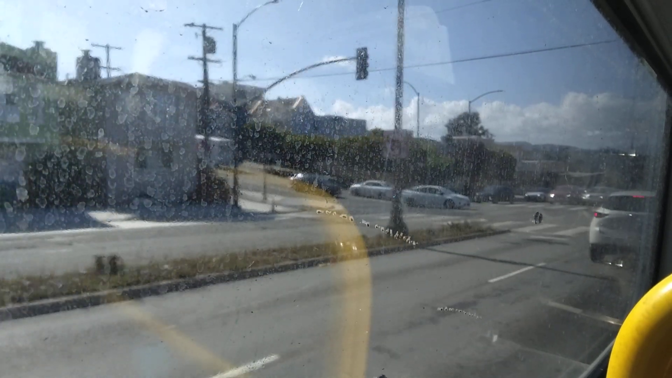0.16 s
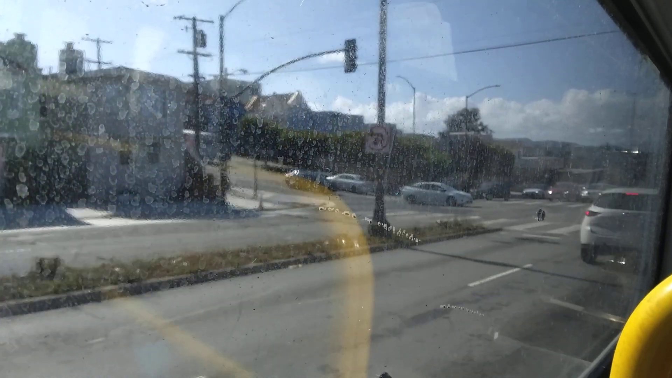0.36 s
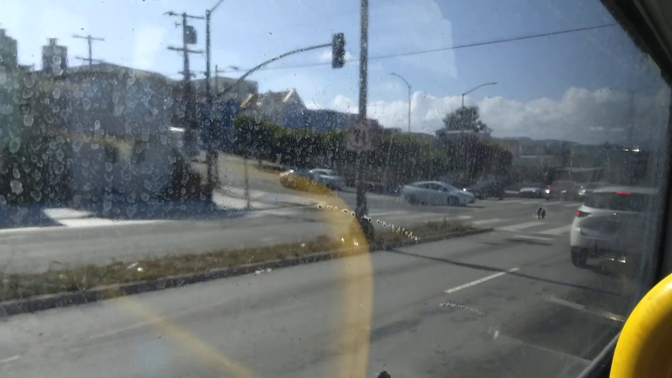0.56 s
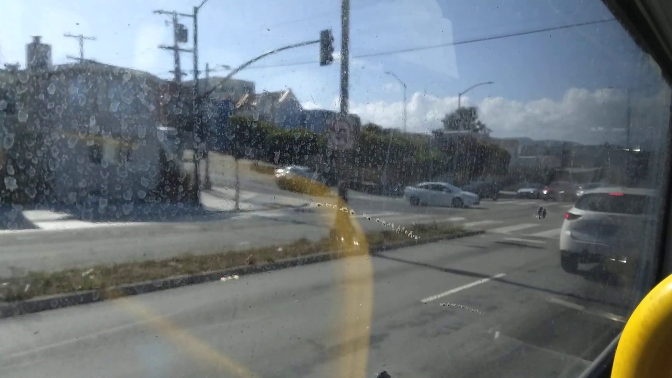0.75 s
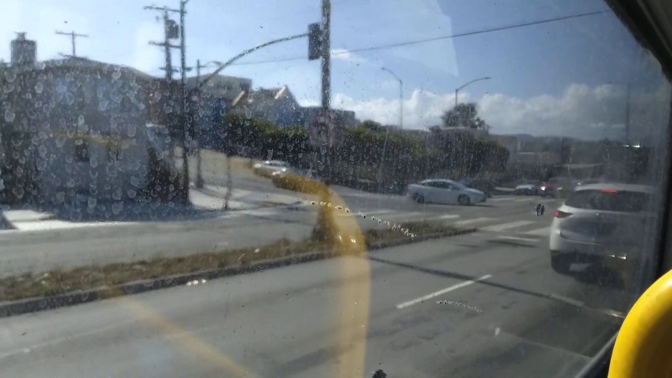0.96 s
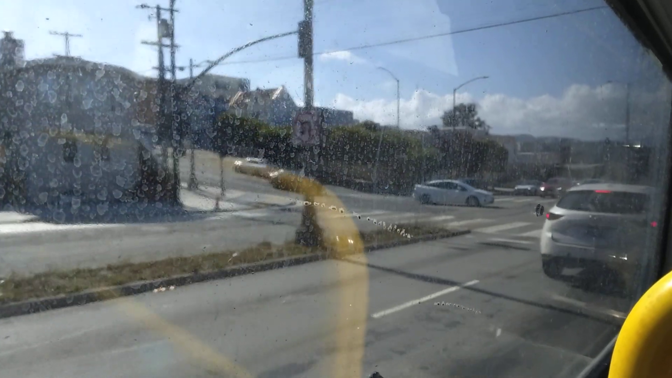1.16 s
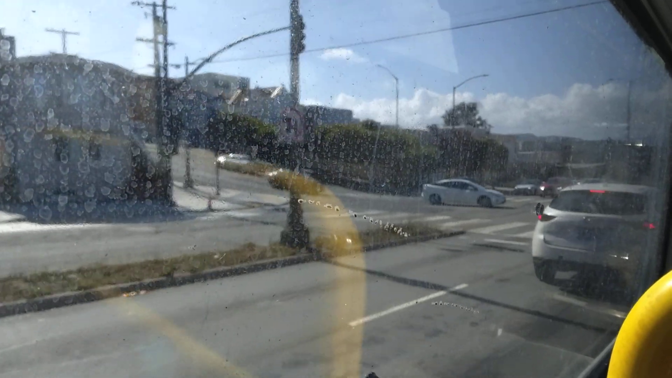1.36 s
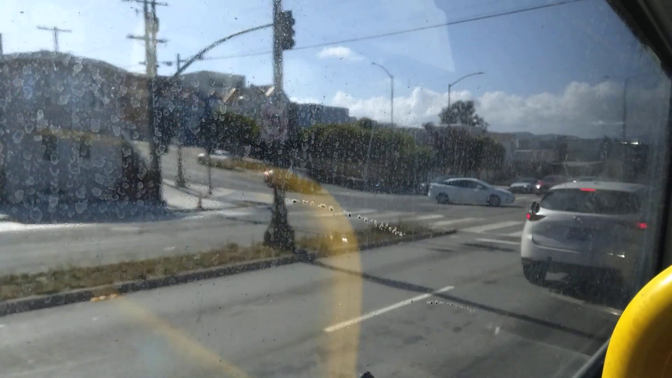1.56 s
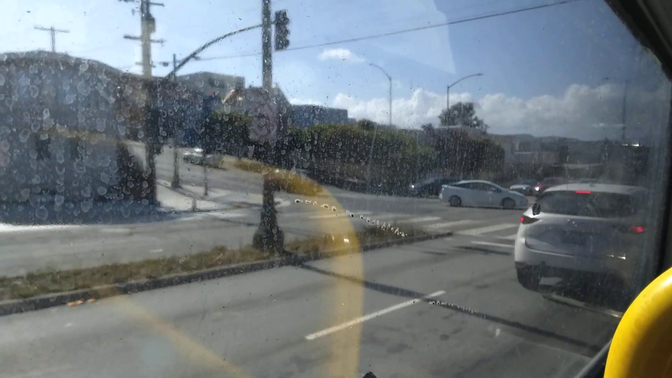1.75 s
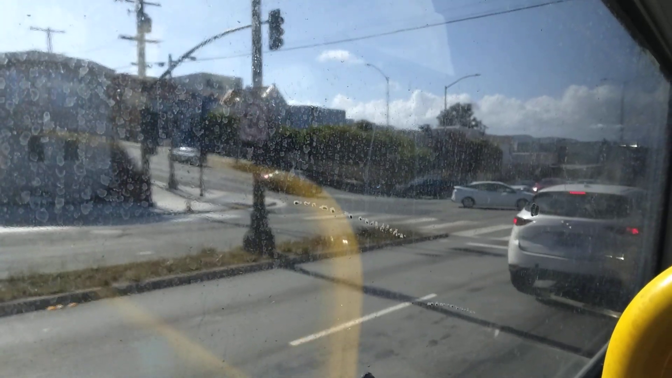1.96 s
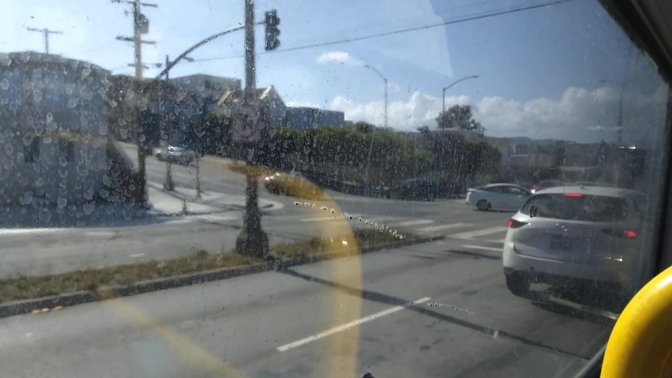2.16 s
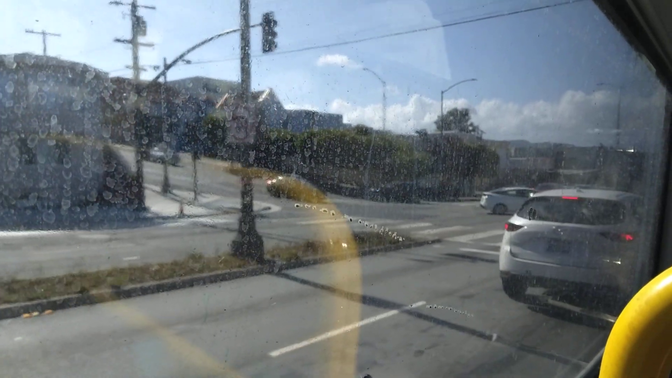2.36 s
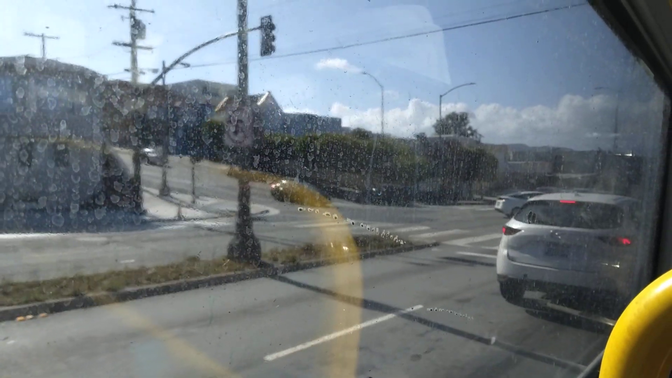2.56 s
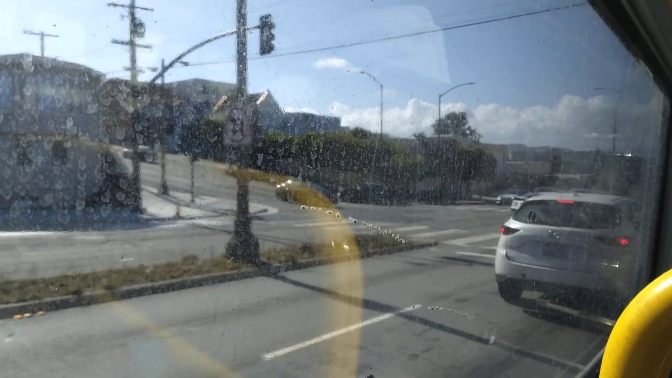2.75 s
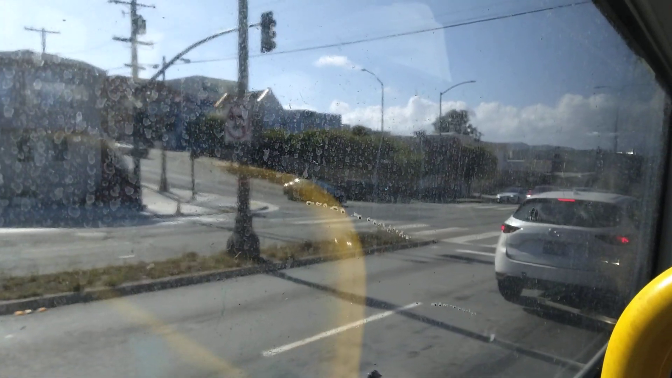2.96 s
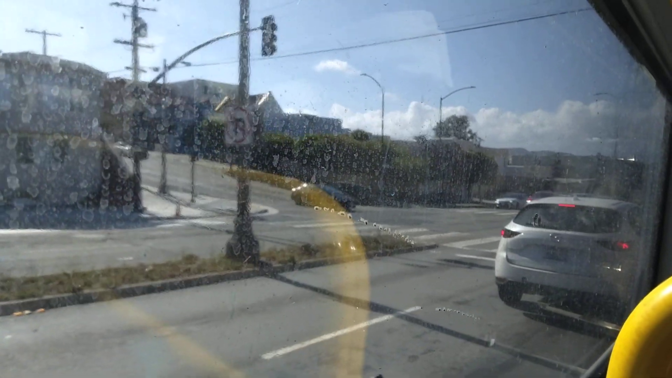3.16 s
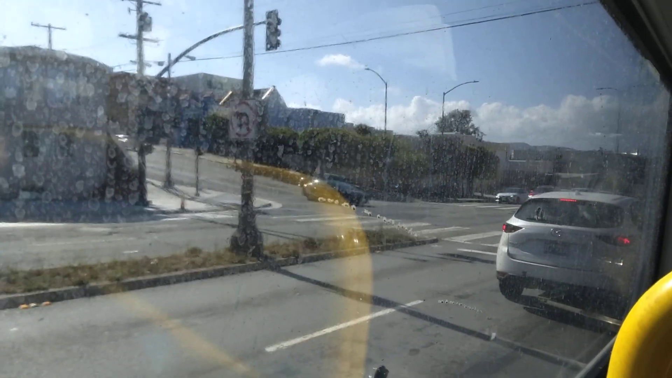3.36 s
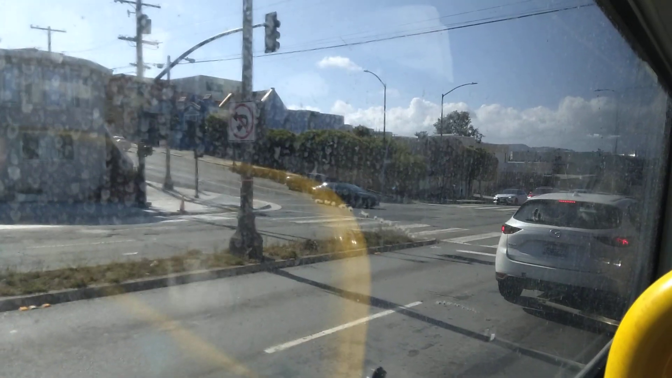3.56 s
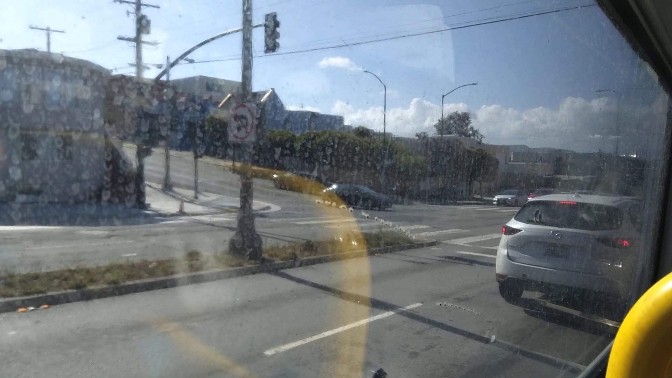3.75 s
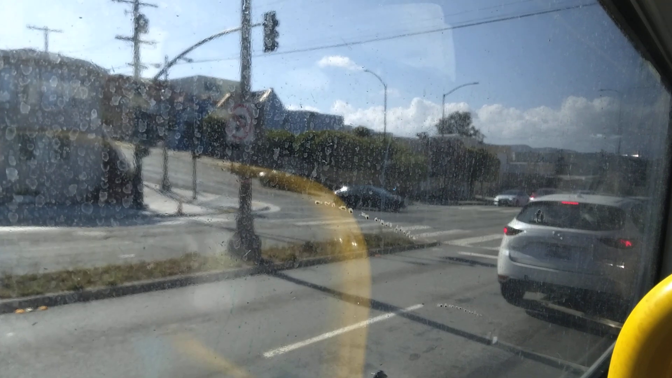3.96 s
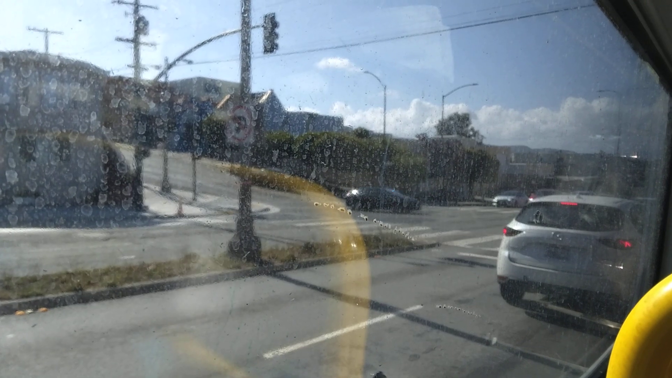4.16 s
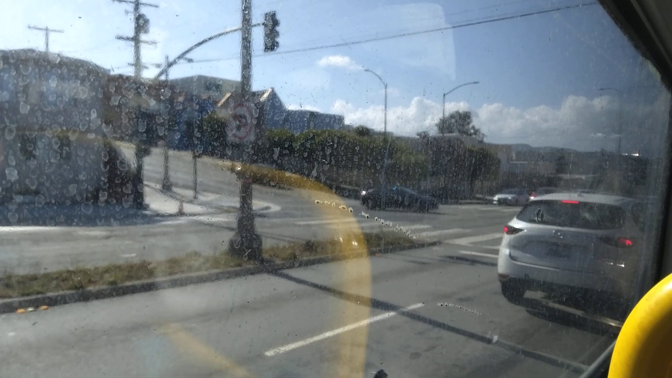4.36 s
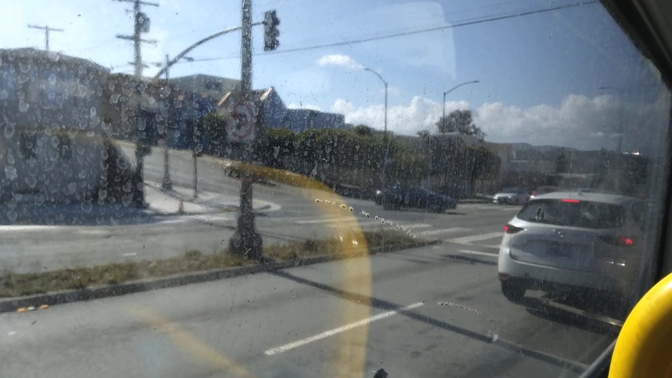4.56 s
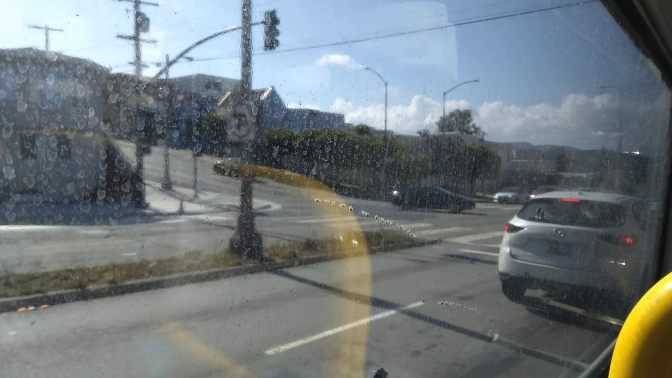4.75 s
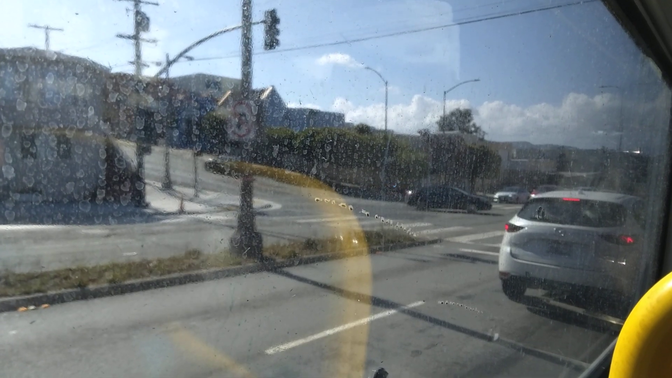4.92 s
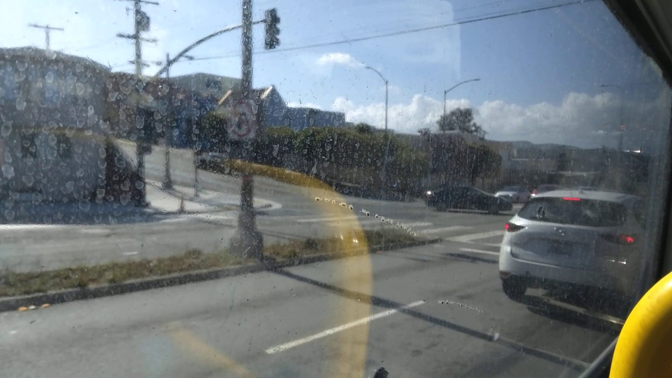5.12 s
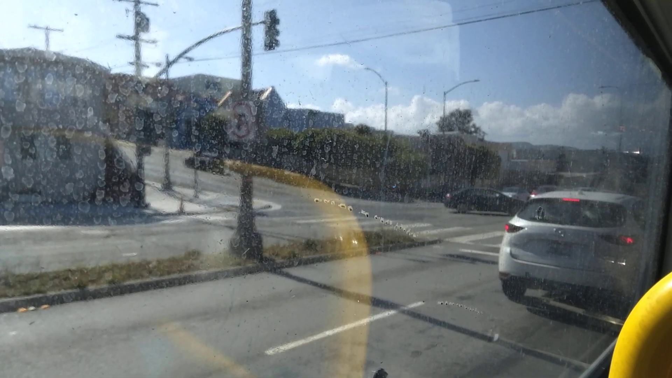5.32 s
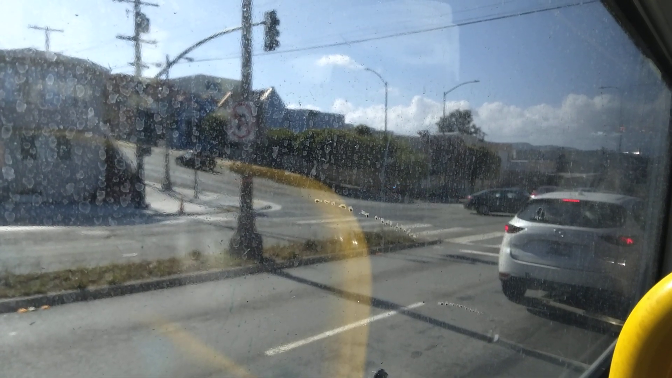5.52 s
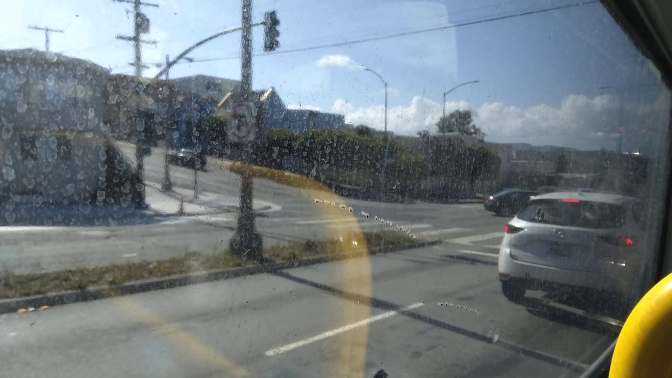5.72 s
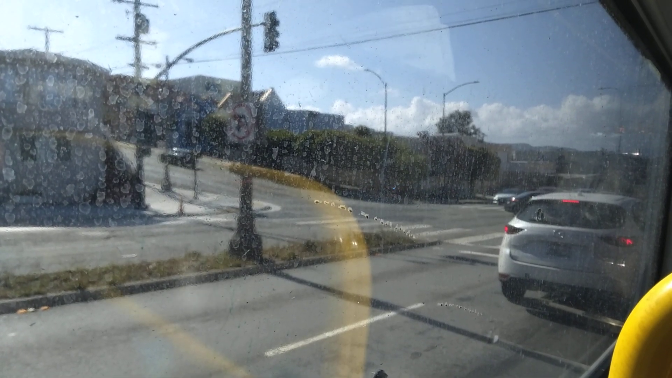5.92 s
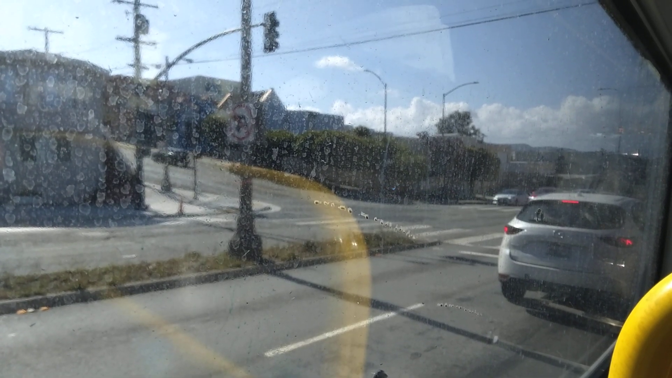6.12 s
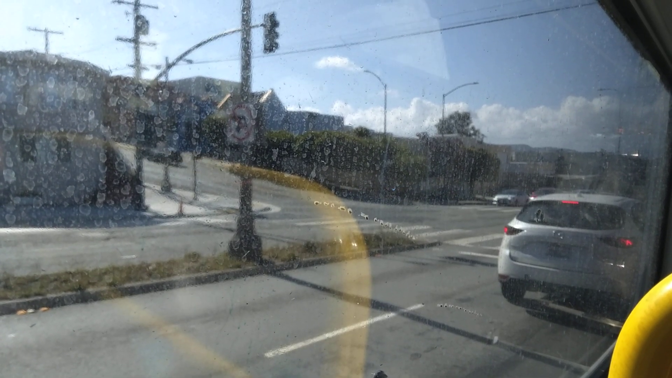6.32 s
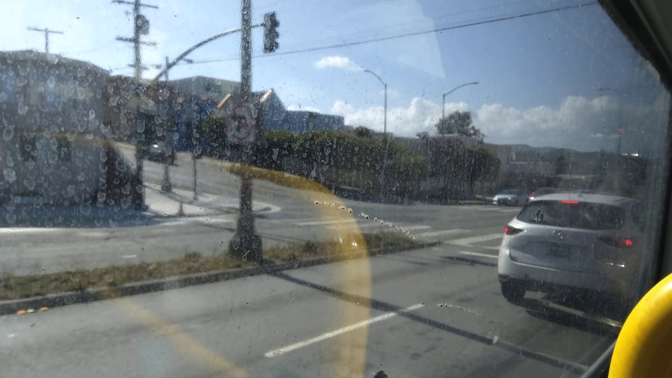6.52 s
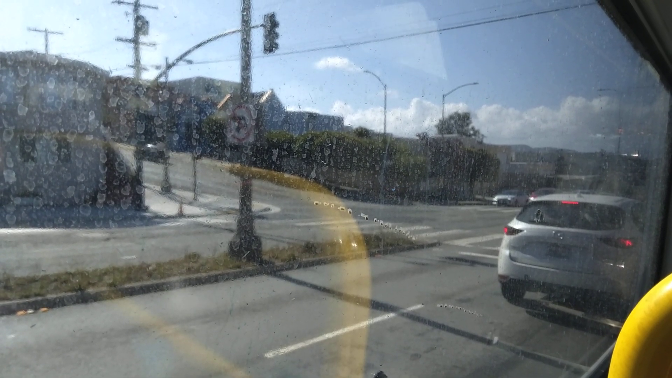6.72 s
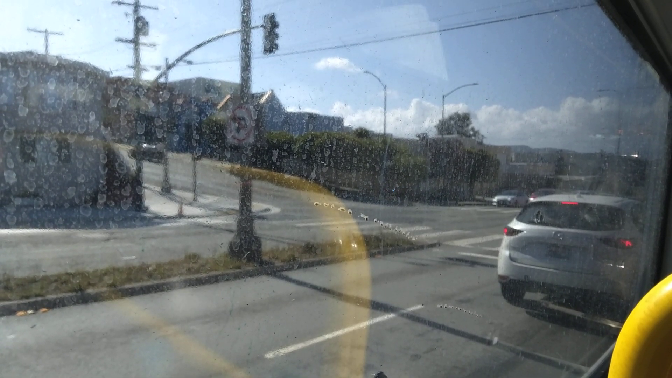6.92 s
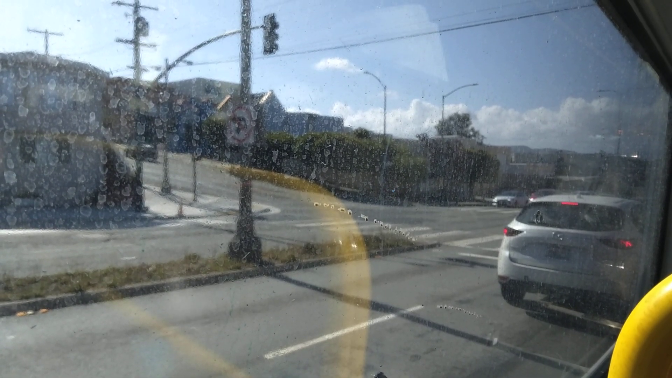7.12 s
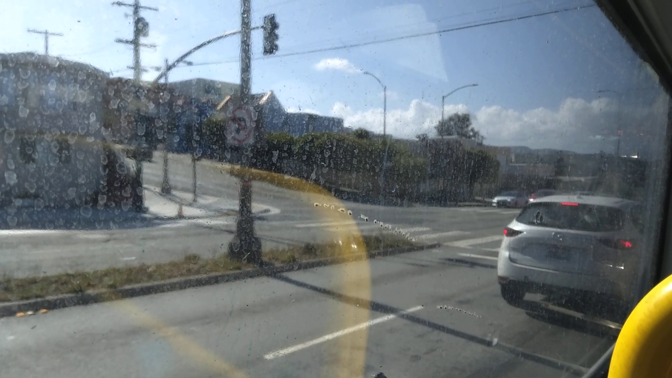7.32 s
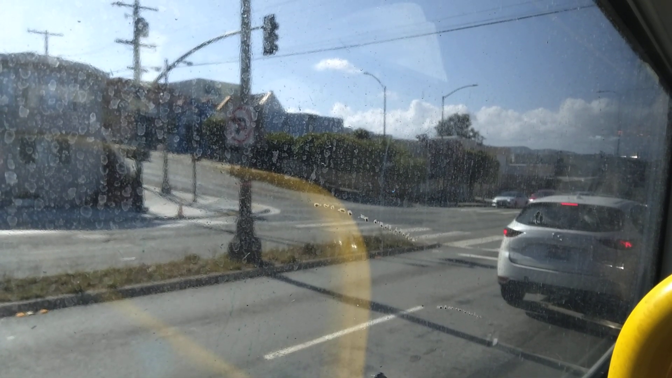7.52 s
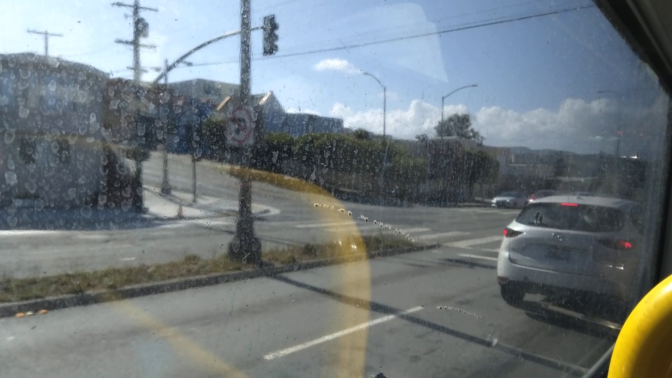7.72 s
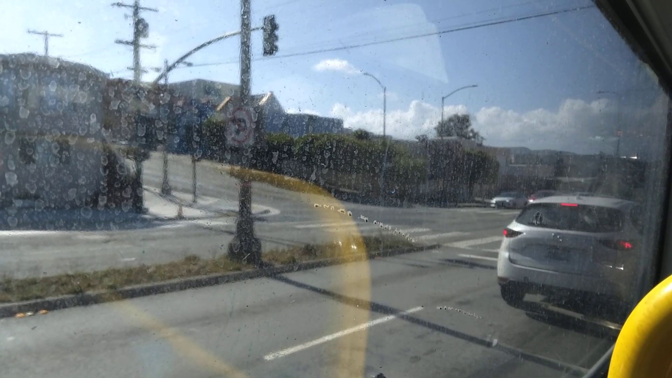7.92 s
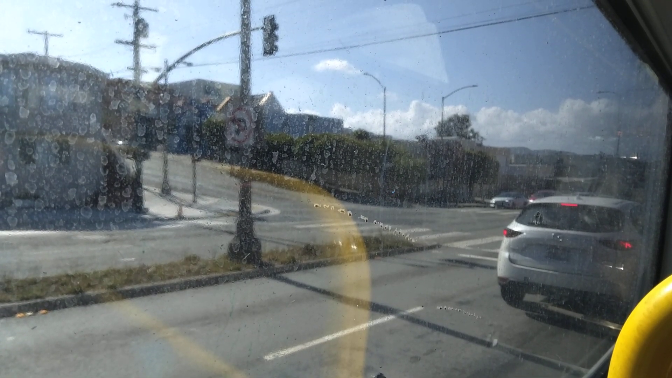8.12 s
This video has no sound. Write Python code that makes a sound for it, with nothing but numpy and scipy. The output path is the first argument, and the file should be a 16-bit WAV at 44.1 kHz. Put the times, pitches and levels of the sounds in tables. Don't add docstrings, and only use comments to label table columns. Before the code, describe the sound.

Heard from within the passenger cabin in stereo, a bus slows under a low engine boom. The drive whine descends and fades out, an opening burst of brake air sags away, and the floor rumbles and rocks. Small ticks and creaks come before the lurching stop; afterwards faint air leaks give way to even idling and soft fan hiss.

```python
import sys
import numpy as np
from scipy import signal
from scipy.fft import rfft, irfft, next_fast_len
from scipy.io import wavfile
from scipy.ndimage import uniform_filter1d

SR = 44100
rng = np.random.default_rng(int(sys.argv[2]) if len(sys.argv) > 2 else 0)


def output_pcm(signal):
    pcm = np.clip(np.atleast_2d(signal).T, -1, 1) * 32767
    wavfile.write(sys.argv[1], SR, np.round(pcm).astype(np.int16))


def volts_from_decibels(level):
    exponent = np.asarray(level, float) / 20
    return 10 ** exponent


N = 360738

CYCLE_HZ = 35.001 / 6

# time [s], mesh pitch [Hz].
ROAD_SPEED = [
    (0, 1925),
    (.27, 1770),
    (.74, 1452),
    (1.14, 1160),
    (1.55, 790),
    (2.2, 280),
    (2.7, 1),
]
# frequency [Hz], correlation [0-1].
LEFT_RIGHT_LIKENESS = [(60, 0.99), (170, 1), (240, 0.93), (340, 0.31), (500, 0.72), (900, 0.46), (2000, 0),
                       (3500, 0)]
# frequency [Hz], level [dB].
AIR_PATH = [(900, -23), (1300, -6.5), (1900, -8), (3400, -2.5), (5100, -6), (6100, -9), (7000, -6.5),
            (8000, -5.5), (8500, -9), (9200, -10), (10700, -10.5), (12000, -16), (15800, -30)]


def curves(table):
    s, *columns = np.transpose(table)
    return [np.interp(np.arange(N) / SR, s, c) for c in columns]


def along(table, hz):
    f, v = np.transpose(table)
    return np.interp(np.log(np.maximum(hz, 1)), np.log(f), v)


def walk(rate):
    hold = int(SR / rate)
    steps = np.repeat(rng.standard_normal(N // hold + 1), hold)
    return 1.314 * uniform_filter1d(uniform_filter1d(steps, hold), hold)[:N]


def wash(colour, flicker_db, rate, count=7):
    size = next_fast_len(N)
    hz = np.arange(size // 2 + 1) * SR / size
    same = np.clip(along(LEFT_RIGHT_LIKENESS, hz), 0, 1)
    noise = rfft(rng.standard_normal((2, size)))
    mid, side = noise * np.sqrt([1 + same, 1 - same]) / np.sqrt(2)
    pair = np.array([mid + side, mid - side]) * volts_from_decibels(along(colour, hz)) * np.sqrt(SR / 2)
    low_hz, high_hz = colour[0][0], colour[-1][0]
    inside = (hz >= low_hz) & (hz <= high_hz)
    place = np.log(np.clip(hz, low_hz, high_hz) / low_hz) / np.log(high_hz / low_hz) * (count - 1)
    out = np.zeros((2, N))
    for k in range(count):
        crossfade = np.clip(1 - abs(place - k), 0, 1)
        band = irfft(pair * inside * crossfade, size)[:, :N]
        out += band * volts_from_decibels(flicker_db * walk(rate))
    return out


def swell(rise, t60):
    t = np.arange(int(t60 * SR)) / SR
    shape = (1 - np.exp(-t / rise)) ** 2 * np.exp(-np.log(1000) * t / t60)
    return t, shape / shape.max()


def add(out, x, s):
    i = int(s * SR)
    out[:, i:i + x.shape[1]] += x[:, :N - i]


def together(*dbs):
    return 10 * np.log10(sum(volts_from_decibels(db) ** 2 for db in dbs))


def halvings():
    return np.log2(ROAD_SPEED[0][1] / np.maximum(curves(ROAD_SPEED)[0], 200))


def rings(hz, base_db, table):
    return together(base_db, *(db - 20 * np.log10(1 + (2 * (hz - f) / width) ** 2)
                               for f, width, db in table))


def crank():
    return CYCLE_HZ * (np.arange(N) / SR - .023) + .0006 * walk(1.2)


def diesel(cycles):
    # time [s], level of the firing tone [dB].
    load = [
        (0, -21.5),
        (.2, -23),
        (.45, -20),
        (1.1, -21.5),
        (1.7, -20),
        (2.1, -25.5),
        (3, -30),
        (4.6, -32.5),
        (5.2, -30.5),
        (8.18, -30),
    ]
    # frequency [Hz], level per order [dB].
    clatter_colour = [(10, -57), (100, -59), (200, -64), (350, -66.5), (500, -67), (700, -71.5),
                      (1000, -71), (1100, -74), (1200, -80), (1700, -78.5), (2500, -89), (4000, -110)]
    # order [multiples of the cycle rate], level [dB].
    strong_orders = [(3, -41.5), (9, -48), (10, -48), (14, -48), (15, -41), (17, -48), (18, -37), (21, -44),
                     (23, -49), (24, -47), (27, -47), (30, -46), (33, -50.5), (34, -49.5), (36, -51.5),
                     (42, -51), (48, -51), (51, -55), (60, -58), (132, -72), (159, -60), (165, -60),
                     (174, -63), (180, -61)]

    fire_db = curves(load)[0]
    second_db = -27 + 0.28 * (fire_db + 31)
    boom = volts_from_decibels(fire_db + 0.88 * walk(10)) * np.cos(12 * np.pi * cycles)
    boom += volts_from_decibels(second_db + .5 * walk(9)) * np.cos(24 * np.pi * cycles + .3)

    order = np.arange(2049)
    db = along(clatter_colour, order * CYCLE_HZ) + 3.1 * rng.standard_normal(order.size)
    db += np.where(order % 6 == 0, 4.5, np.where(order % 3 == 0, 4.0, 0))
    strong, strong_db = np.transpose(strong_orders)
    db[strong.astype(int)] = strong_db
    db[[0, 6, 12]] = -200
    db[700:] = -200
    phase = np.where((order % 6 == 0) & (order <= 30), 0, rng.uniform(0, 2 * np.pi, order.size))
    phase[[9, 15, 21]] = 2 * np.pi * .3
    likeness = np.clip(along(LEFT_RIGHT_LIKENESS, order * CYCLE_HZ), 0, 1)
    apart = rng.uniform(-1.16, 1, order.size) * np.arccos(likeness)
    spectrum = volts_from_decibels(db) * np.exp(1j * (phase + np.outer([1, -1], apart)))
    one_cycle = irfft(spectrum * 8192, 16384)
    where = cycles % 1 * 16384
    clatter = np.array([np.interp(where, np.arange(16384), c, period=16384) for c in one_cycle])
    clatter_db = 0.25 * (second_db + 25) + .6 * walk(3.13)
    return np.sqrt(2) * (boom + clatter * volts_from_decibels(clatter_db))


def knocks(cycles):
    # knocks per cycle, place in the cycle [0-1], pitch [Hz], level [dB], rise [s], t60 [s].
    knock_rows = [
        (1, .73, 886, -45.5, .012, .2),
        (2, .74, 1047, -46.5, .008, .14),
    ]
    out = np.zeros((2, N))
    for per_cycle, place, hz, db, rise, t60 in knock_rows:
        turns = (cycles - place) * round(per_cycle)
        t = turns % 1 / round(per_cycle) / CYCLE_HZ
        size_db = 2.0 * rng.standard_normal(256)[np.floor(turns).astype(int) + 8]
        shape = (1 - np.exp(-t / rise)) ** 2 * np.exp(-np.log(1000) * t / t60)
        ring = np.sin(2 * np.pi * hz * t + np.array([[.6], [-.6]]))
        out += volts_from_decibels(db + 12.0 + size_db) * shape * ring
    return out * volts_from_decibels(curves([(1.2, -2.1), (2.4, 0.14)])[0])


def drive():
    # centre [Hz], width [Hz], level [dB].
    mesh_path = [(1900, 200, -60), (1570, 80, -62), (1265, 50, -53), (1165, 50, -55)]
    # centre [Hz], width [Hz], level [dB].
    lower_path = [(797, 40, -42), (735, 30, -54), (685, 40, -51), (558, 56, -45), (487, 42, -40),
                  (420, 48, -39)]
    # centre [Hz], width [Hz], level [dB].
    far_path = [(6830, 90, -67), (7020, 120, -75), (7220, 80, -71)]

    t, mesh_hz = np.arange(N) / SR, curves(ROAD_SPEED)[0]
    lower_hz = np.maximum(.46 * mesh_hz - 57, 0)
    current_hz = np.maximum(mesh_hz / 11.7 - 7, 0)
    switching_hz, waver_hz = 8000, 14
    far_hz = switching_hz - mesh_hz

    fade_db = 5 * halvings()
    beat_db = 10 * np.log10(1.01 - .85 * np.cos(2 * np.pi * (t - .98) / .36))
    surge_db = -54 - 10 * (t / .15) ** 2
    near_db = beat_db + together(-61 - 7 * halvings(), surge_db)
    voices = [
        (mesh_hz, rings(mesh_hz, -67 - fade_db, mesh_path)),
        (lower_hz, rings(lower_hz, -58 - fade_db, lower_path)),
        (switching_hz - current_hz, near_db),
        (switching_hz + current_hz, near_db - 8),
        (switching_hz - 2 * current_hz, near_db - 13),
        (far_hz, rings(far_hz, -82, far_path)),
    ]
    out = np.zeros((2, N))
    for hz, db in voices:
        apart = 1.3 + .4 * walk(3)
        wavering_hz = hz + waver_hz * (apart - apart.mean())
        phase = 2 * np.pi * np.cumsum(wavering_hz) / SR + np.array([apart, -apart]) / 2
        out += volts_from_decibels(db + 1.5 * walk(14.5)) * np.cos(phase)
    return np.sqrt(2) * out * np.clip(mesh_hz / 300 - 1, 0, 1)


def brake_air():
    # opens [s], shuts [s], level [dB].
    leak_rows = [
        (-.5, 0.46, -57.5),
        (-.5, 1.9, -58),
        (2.42, 2.9, -62.5),
        (3.37, 3.95, -61.5),
    ]
    t = np.arange(N) / SR
    sag_db = 27 * np.maximum(t - .01, 0)
    shut_db = 10 * np.clip((t - .42) / .07, 0, 20)
    valve_db = -39.5 - sag_db - shut_db
    leak_dbs = []
    for opens, shuts, db in leak_rows:
        rise_db = 200 * np.clip(opens - t, 0, 1)
        fall_db = 18 * np.maximum(t - shuts, 0)
        leak_dbs.append(db - rise_db - fall_db)
    leak_db = together(*leak_dbs)
    dull, bright = [
        wash([(hz, db + tilt * np.log2(hz / 4500) - 35) for hz, db in AIR_PATH], 1.1, 24.1, count=5)
        for tilt in (-2.5, 0)]
    share = .85
    dull_db = together(leak_db, valve_db + 10 * np.log10(1.001 - share))
    return volts_from_decibels(dull_db) * dull + np.sqrt(share) * volts_from_decibels(valve_db) * bright


def lurches():
    # start [s], level [dB], pitch [Hz], rise [s], t60 [s].
    jolts = [
        (.063, -18, 28, .02, .21),
        (.33, -31, 124, .12, 2.1),
        (2.675, -31, 200, .01, .15),
        (2.711, -10.5, 52, .024, .18),
        (2.71, -24, 105, .015, .2),
        (2.756, -19, 20.5, .05, 1.0),
        (2.79, -25, 85, .03, .42),
        (2.845, -35, 195, .015, .2),
        (2.73, -36, 150, .015, .3),
        (2.76, -41, 260, .02, .35),
    ]
    # start
    # [s], level [dB], pitch [Hz].
    rockings = [(0, -19, 12), (.19, -15, 13), (.36, -24, 14), (.5, -21, 23), (.62, -21, 14), (.76, -23, 14),
                (.87, -22, 25), (.97, -25, 14), (1.21, -19, 21), (1.36, -27, 14), (1.47, -28, 14),
                (1.78, -26, 14), (1.96, -31, 14), (2.12, -31, 14), (2.27, -32, 14), (3.0, -30, 15),
                (3.16, -27, 15)]
    out = np.zeros((2, N))
    for s, db, hz, rise, t60 in [*jolts, *((*rocking, .03, .4) for rocking in rockings)]:
        t, shape = swell(rise, t60)
        add(out, volts_from_decibels(db) * shape * np.sin(2 * np.pi * hz * t) * np.ones((2, 1)), s)
    return out


def small_sounds():
    # start [s], level [dB], centre [Hz], t60 [s].
    rattle_rows = [
        (.826, -45.5, 2400, .18),
        (.942, -44.5, 2600, .22),
        (1.357, -49.5, 3600, .12),
        (1.955, -54, 2400, .1),
        (3.26, -60, 2200, .08),
    ]
    # start [s], level [dB], centre [Hz], t60 [s].
    tick_rows = [(1.96, -59, 10880, .16), (2.168, -56, 11000, 0.11), (2.468, -59, 10800, .06),
                 (2.558, -63, 10800, .06), (3.177, -63, 10900, .15)]
    # start [s], level [dB], centre [Hz], t60 [s].
    creak_rows = [(.705, -57, 3700, .2), (2.075, -53, 4600, .35), (2.455, -65, 8150, .6)]
    # start [s], level [dB], centre [Hz], t60 [s].
    puff_rows = [
        (.385, -51, 8000, .2),
        (1.228, -59, 11000, .04),
        (2.08, -59, 12000, .3),
        (3.38, -59, 4500, 1.2),
        (6.065, -54, 6000, .22),
    ]
    # start [s], level [dB], centre [Hz], t60 [s].
    scrape_rows = [(2.36, -53.5, 4350, 1.0), (2.38, -58, 3000, .9), (2.4, -54, 2200, .9)]
    kinds = [(2.7, .005, rattle_rows), (.07, .002, tick_rows), (.3, .03, creak_rows),
             (1.8, .012, puff_rows), (.3, .08, scrape_rows)]
    out = np.zeros((2, N))
    for octaves, rise, rows in kinds:
        for s, db, hz, t60 in rows:
            t, shape = swell(rise, t60)
            chance = rng.standard_normal((3, SR + SR))[:, :t.size]
            grains = chance[:2] * volts_from_decibels(2.4 * chance[2])
            limits = np.clip(hz * 2 ** (np.array([-octaves, octaves]) / 2), 300, 16000)
            band_pass = signal.butter(2, limits, "band", fs=SR, output="sos")
            band = signal.sosfilt(band_pass, grains)
            add(out, volts_from_decibels(db) * shape * band / band.std(), s)
    size = next_fast_len(N)
    path_db = 4 + along(AIR_PATH, np.arange(size // 2 + 1) * SR / size)
    return irfft(rfft(out, size) * volts_from_decibels(path_db), size)[:, :N]


def road():
    stop_s = ROAD_SPEED[-1][0]
    settle_db = 13 * np.maximum(np.arange(N) / SR - stop_s, 0)
    sway_db = -34 - 5 * halvings()
    drum_db = -35.5 - 3.5 * halvings()
    sway = wash([(6, -12.5), (12, 0.5), (24, -14.5), (32, -29.0)], 2.4, 4.8, count=2)
    drum = wash([(40, -26), (90, -17.5), (130, -23.5), (190, -21), (260, -33.0), (500, -48)],
                3.0, 9.06, count=3)
    return (sway * volts_from_decibels(sway_db) + drum * volts_from_decibels(drum_db)) * volts_from_decibels(-settle_db)


def cabin(cycles):
    # frequency [Hz], density [dB per Hz].
    fan_low = [(8, -66), (14, -53), (30, -56), (65, -58), (115, -65.5), (170, -66.5), (240, -68),
               (340, -70), (480, -73), (680, -73.5), (900, -76), (1050, -69.5), (1130, -88), (1300, -88.5)]
    # frequency [Hz], density before the 72 dB cut [dB per Hz].
    fan_high = [(1080, -33), (1160, -8.5), (1300, -12), (1520, -7.5), (1900, -10.5), (2800, -18.5),
                (3200, -16), (4400, -25), (5100, -24.5), (6100, -32.5), (7600, -34), (8300, -32.5),
                (9100, -41.5), (10700, -40.5)]
    # frequency [Hz], density before the same cut [dB per Hz].
    fan_top = [(10700, -41), (11800, -49), (13000, -64), (15900, -67)]
    high, top = ([(hz, db - 72) for hz, db in part] for part in (fan_high, fan_top))
    hiss = wash(high, 0.52, 8.6) + wash(top, .6, 8, count=2)
    puff = 1 + .08 * np.cos(12 * np.pi * cycles - 1.5)
    spray = [(8200 + k * 600, -109 - 18 * abs(k)) for k in (-1, 0, 1)]
    spurts = np.exp(1.34 * np.cos(12 * np.pi * cycles + 0.31))
    return wash(fan_low, 0.67, 5.5) + hiss * puff + wash(spray, 1.5, 5, count=2) * spurts


def scene():
    cycles = crank()
    engine = diesel(cycles) + knocks(cycles)
    braking = drive() + brake_air() + lurches()
    return engine + braking + small_sounds() + road() + cabin(cycles)


def low_pass(x):
    return signal.sosfilt(signal.butter(12, 15710, fs=SR, output="sos"), x)


def record(dry):
    # frequency [Hz], left minus right [dB].
    mic_difference = [(120, 0), (200, -4.5), (380, -1), (700, 1), (1300, 3), (2600, 0.5), (4400, 6.5),
                      (5100, 9), (5800, 11), (7600, 19.5), (8400, 12.5), (9200, -2), (10700, -18),
                      (13000, -5)]
    size = next_fast_len(N + 8192)
    hz = np.arange(size // 2 + 1) * SR / size
    lean_db = along(mic_difference, hz) / 2
    knots = rng.standard_normal((2, 4096))
    ripple = np.array([np.interp(hz / 40.15, np.arange(4096), k) for k in knots])
    ripple_db = 2 * ripple * np.clip(hz / 1200 - 1, 0, 1)
    bass_lag_s = 7 / 44100 * np.clip(2 - hz / 150, 0, 1)
    lag = np.exp(np.outer([-1j, 1j], np.pi * hz * bass_lag_s))
    response = lag * volts_from_decibels(np.array([lean_db, -lean_db]) + ripple_db)
    padded = np.pad(dry, ((0, 0), (4096, size - N - 4096)), mode="reflect")
    heard = irfft(rfft(padded) * response, size)[:, 4096:4096 + N]
    hiss = volts_from_decibels(-131) * np.sqrt(SR / 2) * rng.standard_normal((2, N))
    return low_pass(heard + hiss)


dry = scene()
out = record(dry)
output_pcm(out)
```